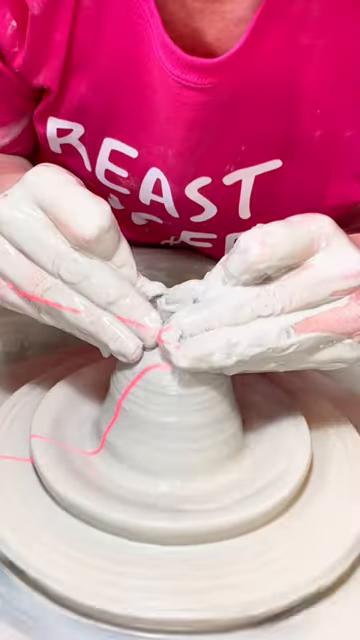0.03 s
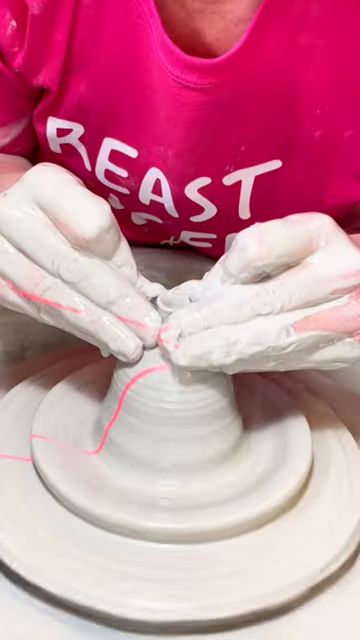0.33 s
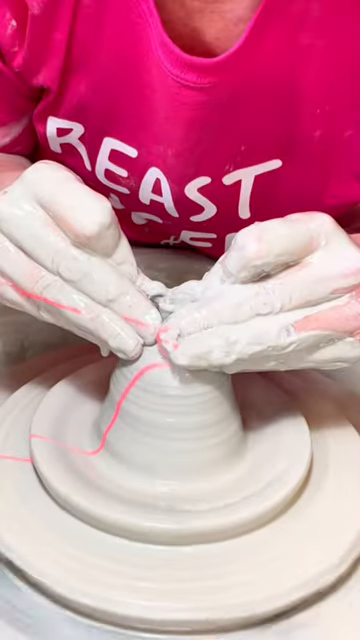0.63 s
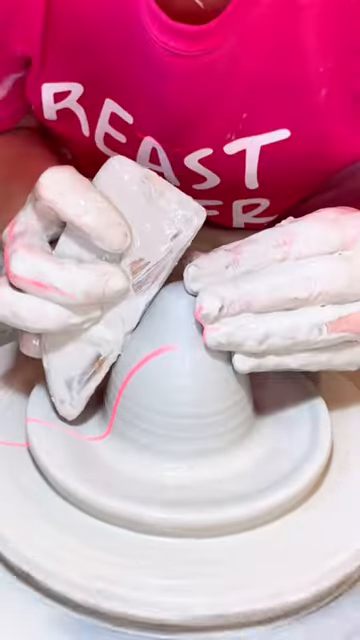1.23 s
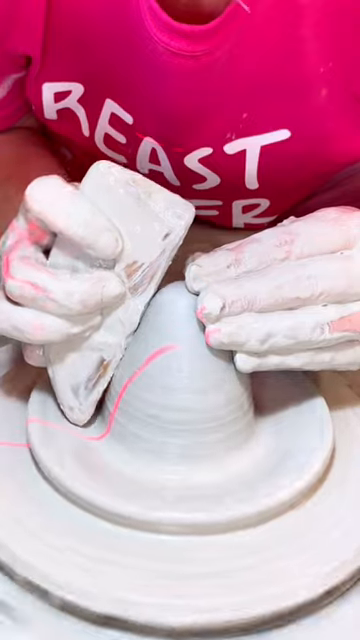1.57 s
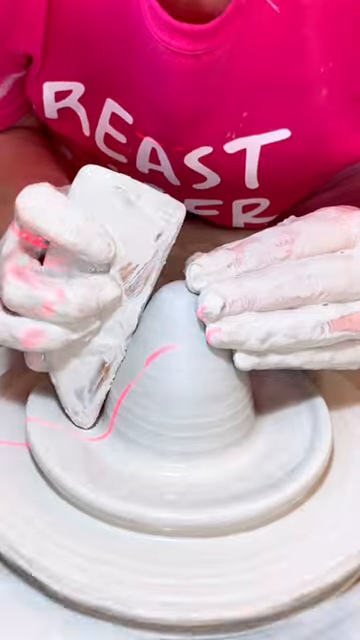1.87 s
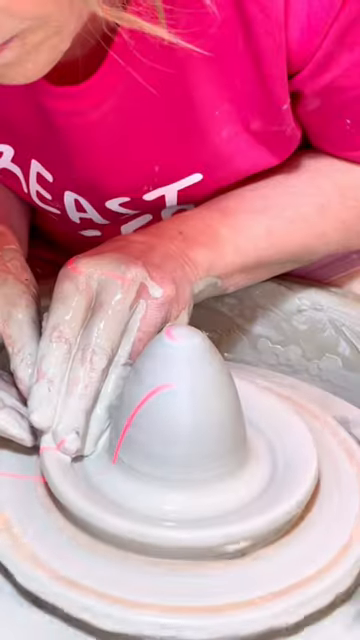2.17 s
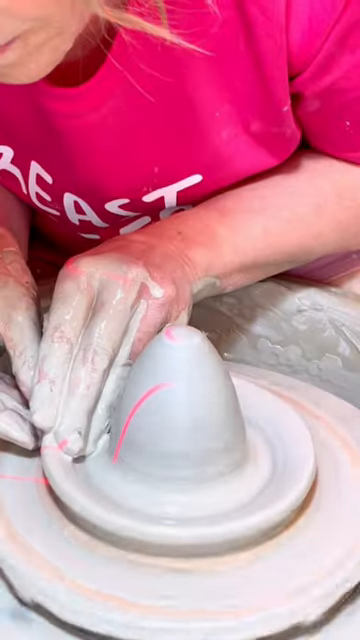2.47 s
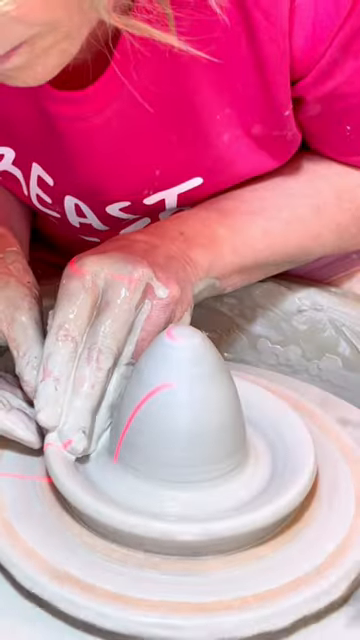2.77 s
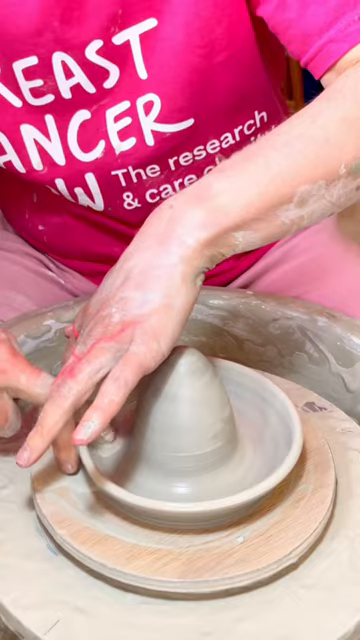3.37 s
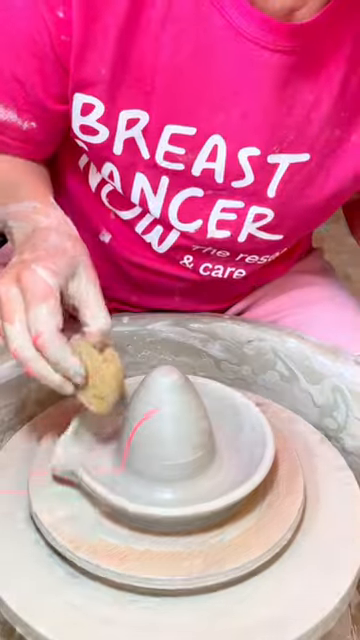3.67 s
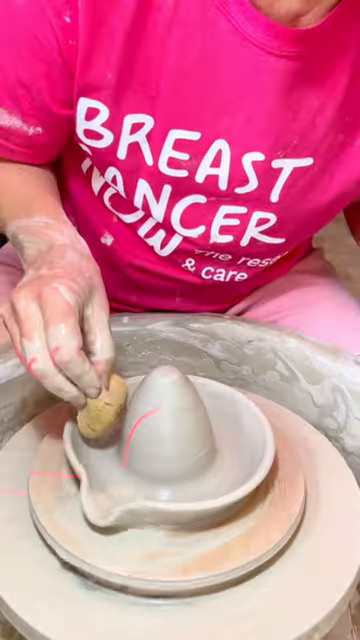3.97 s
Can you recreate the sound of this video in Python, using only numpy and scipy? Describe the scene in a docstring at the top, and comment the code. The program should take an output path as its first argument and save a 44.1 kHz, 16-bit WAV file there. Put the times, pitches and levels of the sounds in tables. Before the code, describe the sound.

An electric potter's wheel hums and rumbles close by in a room. After a dull knock, wet clay rubs softly under hands, then hisses and squeaks faintly. The rumble eases near the end, and another knock comes with light sponge wiping.

```python
"""An electric potter's wheel, close by, in six segments joined by hard cuts.
The motor hums on the mains, its shaft adds a comb of fine lines, and the drive rumbles when hands
bear on the clay. Wet clay hisses and squeaks under fingers and a sponge; the splash pan is knocked
now and then. Room air and a faint steady singing lie underneath."""
import sys
import numpy as np
from scipy.fft import rfft, irfft, next_fast_len
from scipy.io import wavfile
from scipy.ndimage import map_coordinates

SR = 44100
rng = np.random.default_rng(int(sys.argv[2]) if len(sys.argv) > 2 else 0)


def transcribe(u):
    """Save the signal u as a 16-bit wav file named by the first command-line argument.

    u: samples, shape (n,) or (channels, n), limited to [-1, 1]; the rate is SR.
    q: integer samples, one column per channel.
    """
    v = np.clip(np.atleast_2d(u).T, -1, 1)
    q = np.round(v * 32767).astype(np.int16)
    wavfile.write(sys.argv[1], SR, q)


N = 176400

# (start [s], hum gain [dB], motor load [0-1], shaft gain [dB], whine [dB], rumble gain [dB],
#  thrum gain [dB], rub gain [dB], click at the cut [dB], gap [s], fade-in [s])
SEGMENTS = [(0.0, 0, 0.62, 9.5, -67, -3.5, -1, 0.5, -88, 0, .01),
            (0.0564, 0, 1, 0, -57.5, -0.5, -2.5, -1, -26, 0, 0.017),
            (1.0954, -0.5, 1.0, 0, -58.5, -1.5, 1, -0.5, -20.5, 0.0071, 0.021),
            (1.99, 0, 0.99, 2, -82, -2.5, -0.5, -0.5, -31.5, 0, 0.016),
            (3.0227, -3.5, 0.01, 0, -67, -19, -12, -6.5, -21.5, 0, 0.017),
            (3.5345, -3.5, 0.54, -1, -61, -10.5, -4, -9, -28.5, 0, 0.015)]
STEREO_WIDTH = [(100, -50), (200, -37), (380, -14.5), (700, -6.5), (1290, -3), (2400, -32), (4700, -3.5),
                (5400, -10), (6500, -1), (8200, 0), (10000, 33.5), (12000, -3), (14500, -1)]  # (frequency [Hz], side over mid [dB])
STEREO_BALANCE = [(380, 0), (680, -2.2), (1300, -.4), (2400, 0)]  # (frequency [Hz], left over right [dB])

# noise spectra: (frequency [Hz], relative density [dB])
AIR_SPECTRUM = [(100, -2), (900, -0.5), (2000, -21), (2600, -26.5), (5000, -27), (7000, -30.5),
                (12000, -30.5), (14000, -61)]
CONTACT_SPECTRUM = [(150, -4), (550, 10), (900, -15), (1800, -18.5), (2600, -29), (3400, -58),
                    (8000, -67.5)]
RUB_SPECTRUM = [(300, -3.5), (750, -1.5), (1100, -1.5), (1600, -4.5), (2200, -11), (3300, -18.5),
                (4000, -27), (4900, -30.5), (6000, -28), (7000, -32.5), (9000, -44.5), (12000, -54.5),
                (15500, -62.5)]
FINGER_HISS_SPECTRUM = [(900, -26), (1450, 8.5), (2000, -11), (3000, -3), (4500, -5.5), (5400, 1),
                        (7000, 2.5), (8300, 4), (10800, 3.5), (15000, -23)]
FINGER_TOP_SPECTRUM = [(7000, -30), (11800, 0), (13300, -1), (14200, -7), (15600, -6)]
SPONGE_SPECTRUM = [(1200, -5.5), (2500, 1), (3300, -0.5), (7400, -0.5), (15500, -10)]
RUMBLE_SPECTRUM = [(170, -48.5), (235, -10), (290, -2.5), (345, -7), (420, 3.5), (460, -9), (515, -5),
                   (575, -14), (630, -5.5), (680, -5), (740, -21), (950, -36.5), (1400, -87.5)]
THRUM_SPECTRUM = [(10, -44), (24, -24), (36, -6.5), (54, 3.5), (72, 5.5), (115, 3.5), (165, 8.5),
                  (195, -2.5), (230, -14), (320, -53.5)]

SINGING_BANDS = [(1318, 32, -72), (2220, 110, -79), (3380, 200, -83.5), (6060, 240, -85.5)]  # (centre [Hz], width [Hz], level [dB])
# blows on the pan: (time [s], gain [dB], relative contact noise [dB], upper mode slope [dB/octave])
PAN_KNOCKS = [(0.0, -28.5, 1, -12), (0.0123, -19.5, -22, -9.5), (.021, -29.5, -23, -9),
              (2.955, -43, 11.5, -6), (3.6391, -18.5, -5.5, -0.5), (3.647, -33.5, 1, 2)]
PAN_MODES = [(303, -9, 0.072), (396.5, -5.5, .09), (509, -5.5, 0.073), (636, -5, 0.096), (756, -9, 0.028),
             (1060, -18.5, 0.076), (1217, -22.5, 0.071), (1667, -26.5, 0.073)]  # (frequency [Hz], relative level [dB], t60 [s])
# squeaks and one low groan:
# (time [s], length [s], start pitch [Hz], end pitch [Hz], level [dB], roughness [0-1])
CLAY_SQUEAKS = [(0.002, 0.046, 1820, 1820, -55, 0.3), (0.897, 0.1, 6100, 6200, -75.5, 0.86),
                (1.108, .1, 2230, 2240, -66, .4), (2.512, .018, 3020, 2980, -61, 0.5),
                (2.548, .028, 2920, 2630, -59.5, 0.8), (2.651, 0.02, 2760, 2680, -57.5, 0.5),
                (3.558, .06, 435, 421, -41, .15), (3.61, 0.027, 3720, 3830, -70, .6),
                (3.62, .03, 4420, 4280, -73, .5), (3.688, 0.039, 3800, 3730, -70.5, .6),
                (3.924, 0.051, 3760, 3920, -65, .7), (3.968, 0.024, 3950, 4200, -63, 0.4),
                (3.892, 0.086, 7260, 7200, -66, .7)]
# (time [s], length [s], start centre [Hz], end centre [Hz], level [dB])
CLAY_SWISHES = [(2.03, .24, 6100, 5700, -62.5), (2.672, 0.15, 6200, 5440, -57.5)]
CLAY_TICKS = [(2.955, 2520, -55), (3.308, 5050, -70)]  # (time [s], centre [Hz], level [dB])
SPONGE_ENVELOPE = [(3.54, -69.5), (3.57, -67), (3.77, -62), (4.0, -63)]  # (time [s], gain [dB])
SPONGE_SQUEAL_BANDS = [(2230, 240, -6), (2500, 250, -9), (2880, 180, -10.5), (3705, 430, -9),
                       (5230, 430, -17.5), (5840, 280, -18), (6750, 300, -19), (7260, 180, -17)]  # (centre [Hz], width [Hz], relative level [dB])
FINGER_ENVELOPE = [(2.02, -61, -67), (2.038, -59, -61.5), (2.224, -56.5, -63), (2.314, -61, -61.5),
                   (2.36, -56.5, -55.5), (2.546, -59, -55), (2.588, -61.5, -61.5), (2.68, -56, -55.5),
                   (2.77, -57, -56.5), (2.896, -62, -64.5), (3.01, -58.5, -59)]  # (time [s], hiss gain [dB], top band gain [dB])
# motor lines, relative levels: (harmonic, no load [dB], half load [dB], full load [dB])
HUM_LINES = [(1, -26, -26, -26), (2, -58, -52, -55), (3, -38, -38.5, -43), (4, -54, -55, -53),
             (5, -47, -54, -56), (7, -51.5, -62, -61), (9, -58, -64, -67), (11, -60, -76, -80),
             (13, -66, -70, -70), (15, -76, -77, -77), (17, -75, -80, -81), (19, -66, -80, -80),
             (22, -73, -80, -80)]
SHAFT_LINES = [(2, -55, -53, -48), (3, -56, -53, -50), (5, -59, -50, -46), (6, -55, -52, -43),
               (7, -59, -56, -56), (13, -50, -48, -50), (14, -72, -50, -51), (15, -67, -55, -54),
               (17, -63, -44, -46), (18, -71, -66, -61), (21, -73, -66, -62), (24, -64, -60, -61),
               (25, -64, -56, -56), (26, -70, -70, -67), (27, -65, -68, -63), (31, -63, -68, -69),
               (32, -66, -66, -69), (33, -60, -65, -68), (35, -66, -62, -63), (38, -69, -73, -75),
               (39, -65, -76, -75), (41, -73, -80, -80), (45, -82, -82, -81), (49, -81, -81, -77),
               (53, -76, -76, -73), (57, -82, -82, -82)]

AIR_DB, RUB_DB, RUMBLE_DB, THRUM_DB = -58, -53.5, -37.5, -38.5
KNOCK_RISE_S, CONTACT_T60_S, PAN_PIVOT_HZ = 0.00033, 0.035, 520
SQUEAK_WIDTH_HZ, SWISH_WIDTH_HZ, TICK_WIDTH_HZ, TICK_S = 190, 1200, 1900, 0.01
FINGER_SEGMENT, SPONGE_SEGMENT = 3, 5
TURN_HZ, TURN_SWELL_DB = 2.914, 0.93
HUM_HZ, SHAFT_HZ, WHINE_ORDER = 99.92, 24.9, 37
HUM_WAVER, SHAFT_WAVER, RUMBLE_WAVER, WAVER_RATE_HZ = 0.022, 0.08, 0.5, 8
CLICK_DECAY_S, FADE_EXPONENT, CUTOFF_HZ = 0.0013, 1.23, 15700
TIME_S = np.arange(N) / SR


def amp(db):
    """Decibels to gain."""
    return 10 ** (np.asarray(db) / 20)


def unit_rms(x):
    """Scale to rms 1."""
    return x / np.sqrt(np.mean(np.abs(x) ** 2) + 1e-20)


def log_interp(points, hz):
    """Interpolate (frequency [Hz], value) points on a log axis."""
    knots_hz, values = np.transpose(points)
    return np.interp(np.log(hz + 1), np.log(knots_hz + 1), values)


def envelopes(rows):
    """One value per sample for each column after the time."""
    knots_s, *columns = np.transpose(rows)
    return [np.interp(TIME_S, knots_s, column) for column in columns]


def wobble(rate_hz):
    """Smooth random curve, rate_hz knots a second."""
    return map_coordinates(rng.standard_normal(4096), [TIME_S * rate_hz], mode="mirror")


def filtered(x, response):
    """Apply a gain given as a function of frequency."""
    size = next_fast_len(N + SR // 2)
    return irfft(rfft(x, size) * response(np.fft.rfftfreq(size, 1 / SR)), size)[..., :N]


def noise(spectrum):
    """Coloured stereo noise of rms 1, near mono in the bass."""
    def mid_side_gains(hz):
        angle = np.arctan(amp(log_interp(STEREO_WIDTH, hz)))
        return amp(log_interp(spectrum, hz)) * [np.cos(angle), np.sin(angle)]
    mid, side = filtered(rng.standard_normal((2, N)), mid_side_gains)
    return unit_rms(np.array([mid + side, mid - side]))


def band(hz, width_hz):
    """Noise band of rms 1 round a steady or gliding centre."""
    phase = 2 * np.pi * np.cumsum(hz * np.ones(N)) / SR
    return unit_rms(wobble(width_hz) * np.sin(phase) + wobble(width_hz) * np.cos(phase))


def glide(start_s, length_s, start_hz, end_hz, width_hz, roughness):
    """Gliding mix of sine and noise that swells and dies."""
    progress = np.clip((TIME_S - start_s) / length_s, 0, 1)
    hz = start_hz + progress * (end_hz - start_hz)
    sine = np.sqrt(2) * np.sin(2 * np.pi * np.cumsum(hz) / SR)
    swell = np.sqrt(np.abs(np.sin(np.pi * progress)))
    return swell * (np.sqrt(1 - roughness ** 2) * sine + roughness * band(hz, width_hz))


def tone(hz, waver):
    """Line of rms near 1; level and phase wander by the share waver."""
    wander = wobble(WAVER_RATE_HZ) + 1j * wobble(WAVER_RATE_HZ)
    drift = (1 + waver * wander) / np.sqrt(1 + 2 * waver ** 2)
    return np.sqrt(2) * np.imag(drift * np.exp(2j * np.pi * (hz * TIME_S + rng.random())))


def room_air():
    """Steady, dull room noise."""
    return amp(AIR_DB) * noise(AIR_SPECTRUM)


def singing():
    """Thin noise bands of the running wheel, probably from the bearings."""
    return sum(amp(db) * band(hz, width_hz) for hz, width_hz, db in SINGING_BANDS)


def pan_knocks():
    """Dull blows ring the plastic pan, each with a puff of contact noise."""
    out = np.zeros((2, N))
    puff = noise(CONTACT_SPECTRUM)
    for start_s, gain_db, contact_db, slope_db_per_octave in PAN_KNOCKS:
        age_s = np.maximum(TIME_S - start_s, 0)
        ring = np.zeros(N)
        for k, (hz, mode_db, t60_s) in enumerate(PAN_MODES):
            tilt_db = slope_db_per_octave * max(np.log2(hz / PAN_PIVOT_HZ), 0)
            decay = amp(mode_db + tilt_db - 60 * age_s / t60_s)
            ring += (-1) ** k * decay * np.sin(2 * np.pi * hz * age_s)
        contact = amp(contact_db - 60 * age_s / CONTACT_T60_S) * puff
        attack = 1 - np.exp(-age_s / KNOCK_RISE_S)
        out += amp(gain_db) * attack * (ring + contact)
    return out


def slip_film():
    """The film of slip sticks and squeaks, swishes under harder pressure, and ticks as it parts."""
    squeaks = sum(amp(db) * glide(*path, SQUEAK_WIDTH_HZ, roughness)
                  for *path, db, roughness in CLAY_SQUEAKS)
    swishes = sum(amp(db) * glide(*path, SWISH_WIDTH_HZ, roughness=1) for *path, db in CLAY_SWISHES)
    ticks = sum(amp(db) * glide(start_s, TICK_S, hz, hz, TICK_WIDTH_HZ, roughness=0.9)
                for start_s, hz, db in CLAY_TICKS)
    return squeaks + swishes + ticks


def sponge():
    """A sponge wipes the dish: squealing bands over hiss."""
    gain_db, = envelopes(SPONGE_ENVELOPE)
    squeal = sum(amp(db + 2.3 * wobble(25)) * band(hz, width_hz)
                 for hz, width_hz, db in SPONGE_SQUEAL_BANDS)
    return amp(gain_db + 2.0 * wobble(40)) * (squeal + amp(-1) * noise(SPONGE_SPECTRUM))


def fingers():
    """Fingers smooth the rim: a bright, flickering hiss."""
    hiss_db, top_db = envelopes(FINGER_ENVELOPE)
    hiss = amp(hiss_db + 6.5) * noise(FINGER_HISS_SPECTRUM)
    top = amp(top_db + 1.5) * noise(FINGER_TOP_SPECTRUM)
    return (hiss + top) * amp(0.98 * wobble(120))


def clay_rub(gain_db):
    """Wet clay slides softly under the hands."""
    return amp(RUB_DB + gain_db + 0.62 * wobble(12)) * noise(RUB_SPECTRUM)


def drive(rumble_db, thrum_db):
    """Belt and bearings shake frame and pan; the rumble swells once a turn with the load."""
    swell_db = TURN_SWELL_DB * np.sin(2 * np.pi * TURN_HZ * TIME_S) + 1.1 * wobble(24.58)
    rumble = amp(RUMBLE_DB + rumble_db + swell_db) * noise(RUMBLE_SPECTRUM)
    thrum = amp(THRUM_DB + thrum_db) * noise(THRUM_SPECTRUM)
    return rumble + thrum


def motor(hum_db, load, shaft_db, whine_db, rumble_db):
    """Mains hum and shaft lines, rebalanced by load and unsettled by rumble, plus a thin whine."""
    def line_gain(levels_db):
        return amp(np.interp(load, [0, 0.5, 1], levels_db))
    shake = amp(rumble_db)
    hum = sum(line_gain(levels_db) * tone(k * HUM_HZ, HUM_WAVER * (1 + shake * (k - 1)))
              for k, *levels_db in HUM_LINES)
    shaft = sum(line_gain(levels_db) * tone(k * SHAFT_HZ, SHAFT_WAVER + RUMBLE_WAVER * shake)
                for k, *levels_db in SHAFT_LINES)
    whine = tone(WHINE_ORDER * SHAFT_HZ, SHAFT_WAVER)
    return amp(hum_db) * hum + amp(shaft_db) * shaft + amp(whine_db) * whine


def scene():
    """Wheel, clay, knocks and air, with the settings of each segment."""
    segment = np.searchsorted([row[0] for row in SEGMENTS[1:]], TIME_S)
    _, hum_db, load, shaft_db, whine_db, rumble_db, thrum_db, rub_db, *_ = np.array(SEGMENTS)[segment].T
    wheel = motor(hum_db, load, shaft_db, whine_db, rumble_db) + drive(rumble_db, thrum_db)
    clay = clay_rub(rub_db)
    clay += (segment == FINGER_SEGMENT) * fingers() + (segment == SPONGE_SEGMENT) * sponge()
    mix = wheel + clay + singing() + slip_film() + pan_knocks() + room_air()
    return filtered(mix, lambda hz: amp(log_interp(STEREO_BALANCE, hz) * np.array([[0.5], [-0.5]])))


def record(dry):
    """At each cut: a click, an optional gap, a fade-in. Then a low-pass."""
    x = dry
    for cut_s, *_, click_db, gap_s, fade_s in SEGMENTS[1:]:
        age_s = TIME_S - cut_s
        click = np.exp(-np.abs(age_s) / CLICK_DECAY_S)
        before = x * (1 - click) + amp(click_db) * click
        after = x * np.clip((age_s - gap_s) / fade_s, 0, 1) ** FADE_EXPONENT
        x = np.where(age_s < 0, before, after)
    return filtered(x, lambda hz: hz < CUTOFF_HZ)


dry = scene()
out = record(dry)
transcribe(out)
```